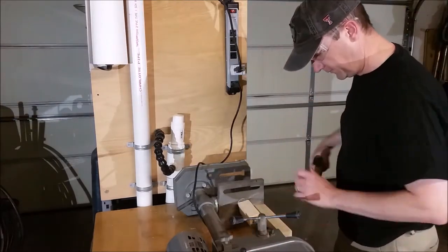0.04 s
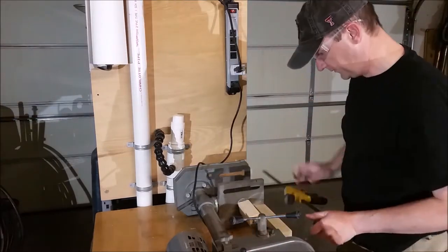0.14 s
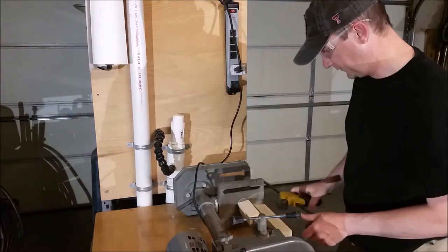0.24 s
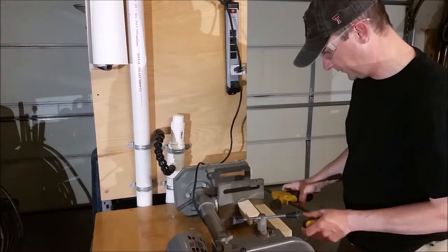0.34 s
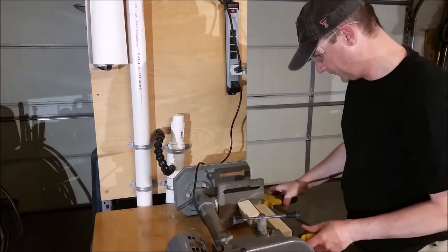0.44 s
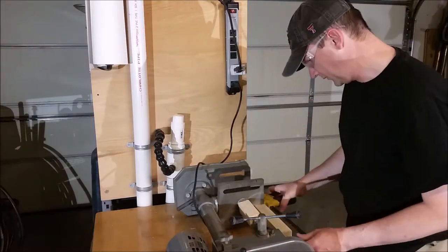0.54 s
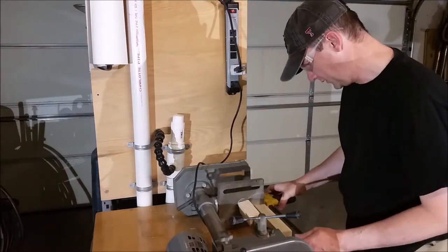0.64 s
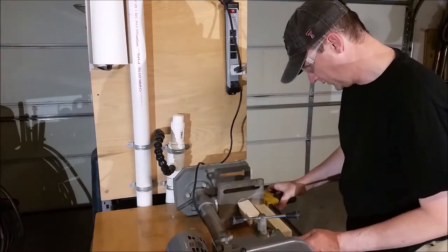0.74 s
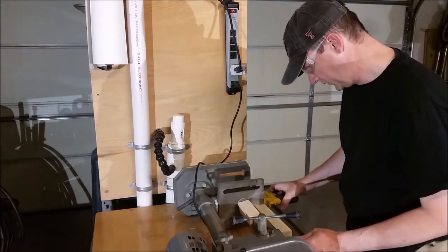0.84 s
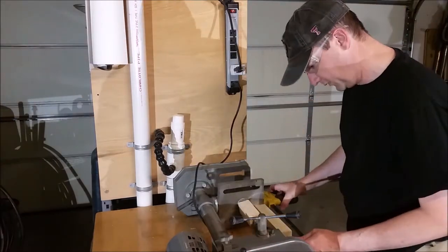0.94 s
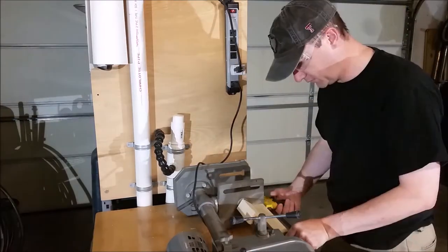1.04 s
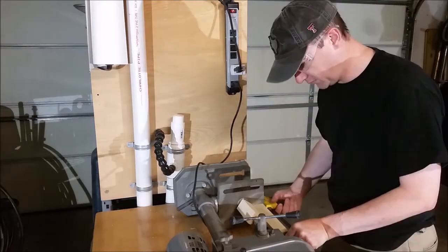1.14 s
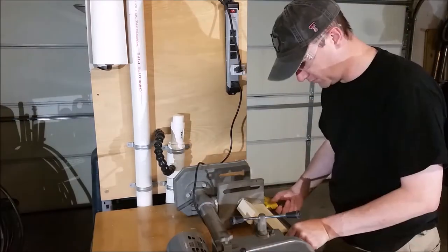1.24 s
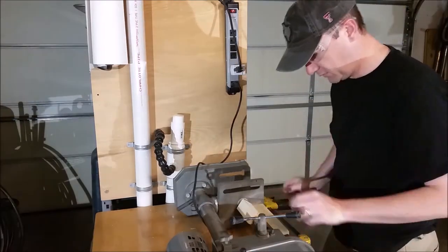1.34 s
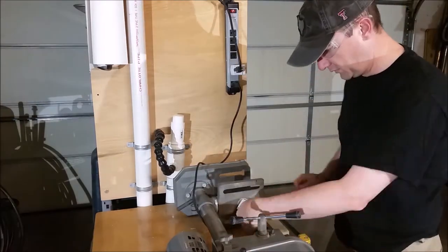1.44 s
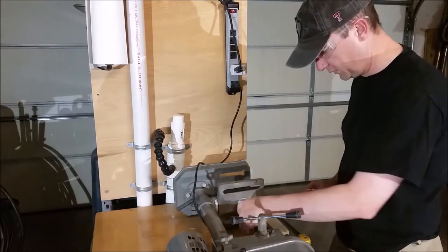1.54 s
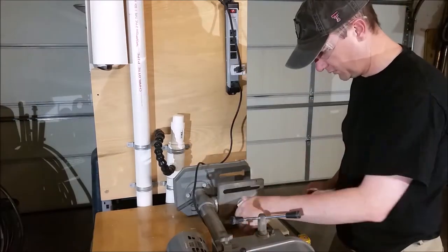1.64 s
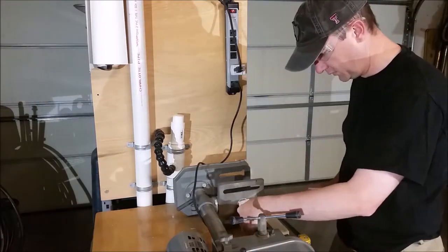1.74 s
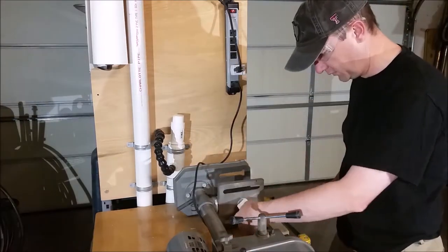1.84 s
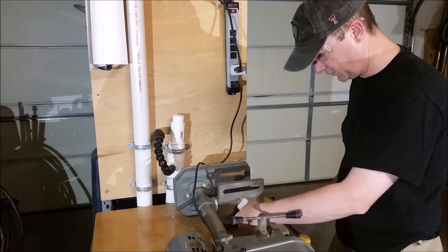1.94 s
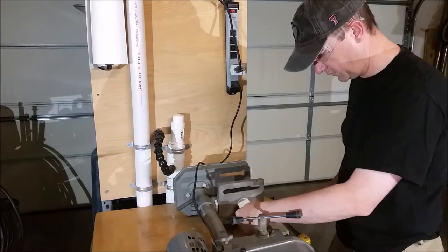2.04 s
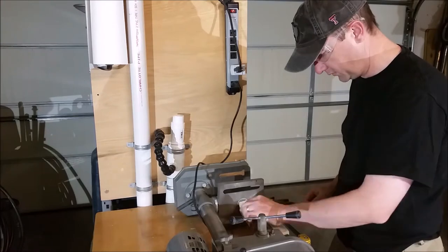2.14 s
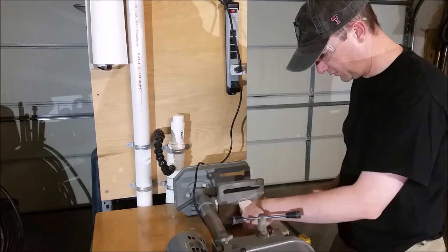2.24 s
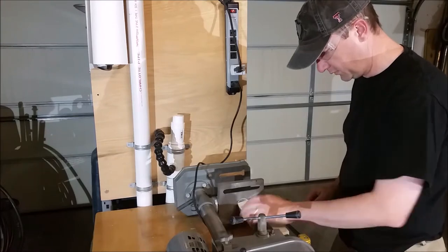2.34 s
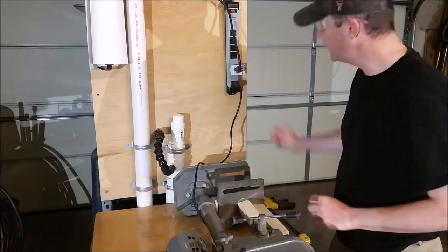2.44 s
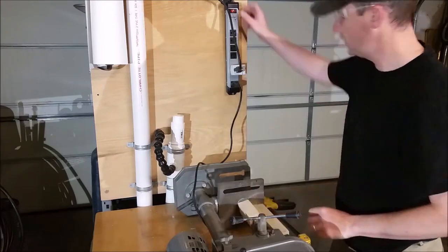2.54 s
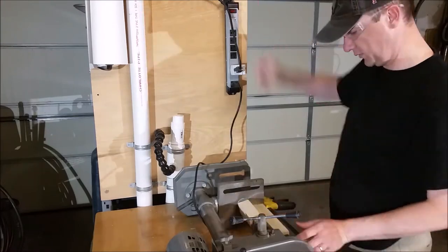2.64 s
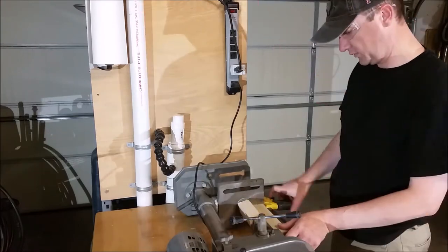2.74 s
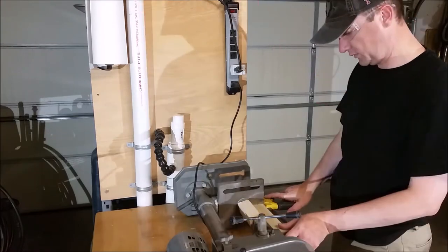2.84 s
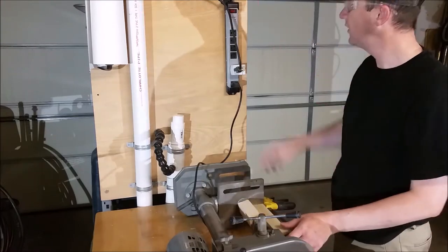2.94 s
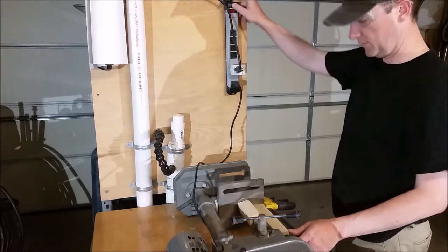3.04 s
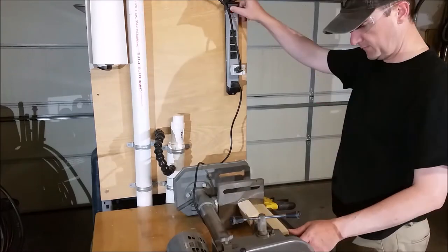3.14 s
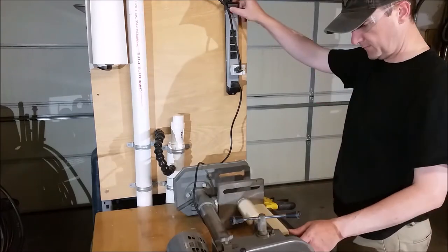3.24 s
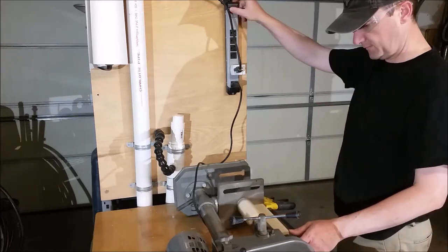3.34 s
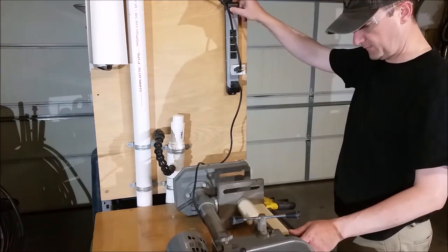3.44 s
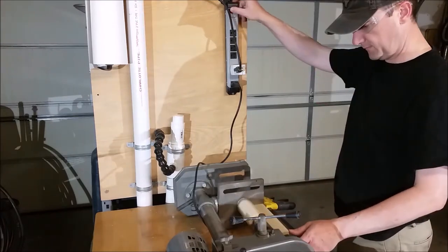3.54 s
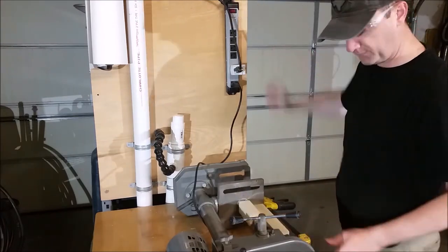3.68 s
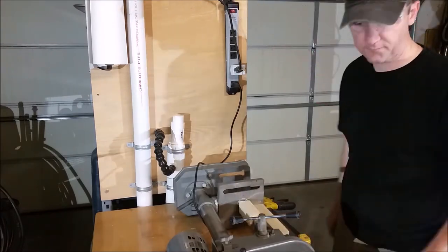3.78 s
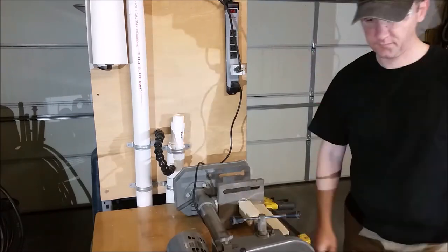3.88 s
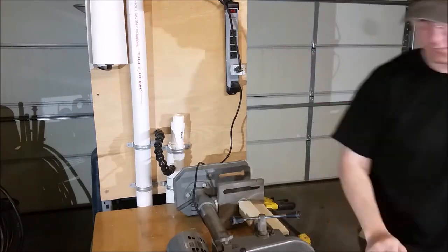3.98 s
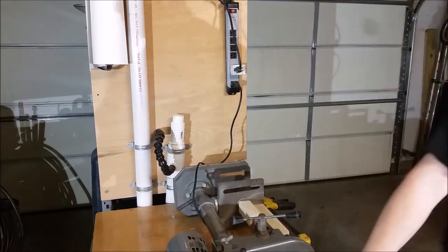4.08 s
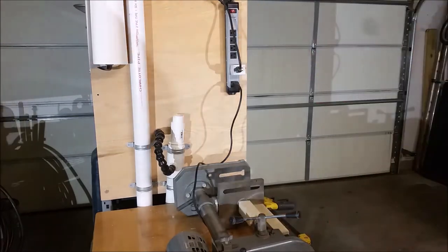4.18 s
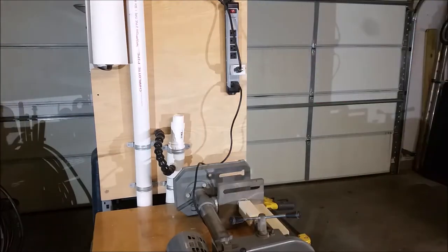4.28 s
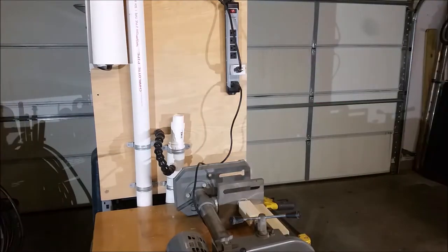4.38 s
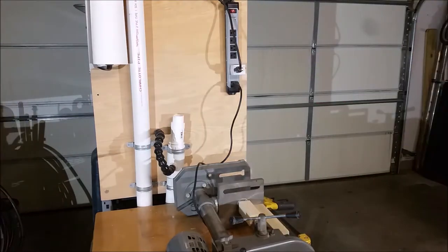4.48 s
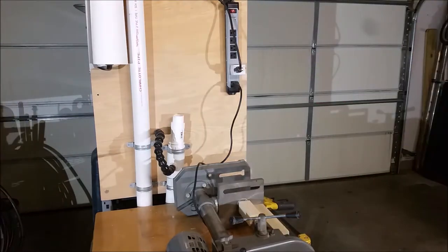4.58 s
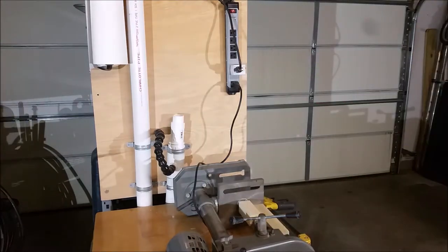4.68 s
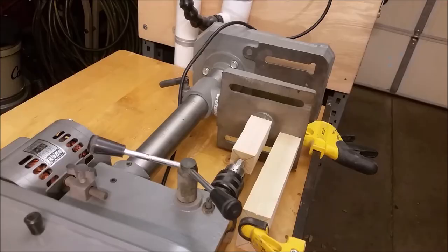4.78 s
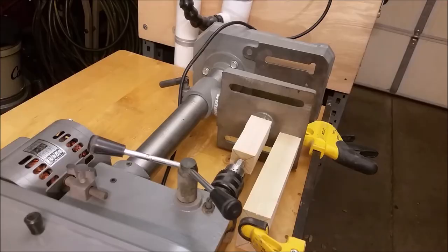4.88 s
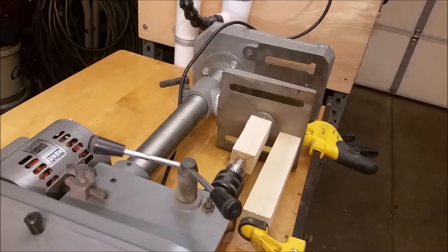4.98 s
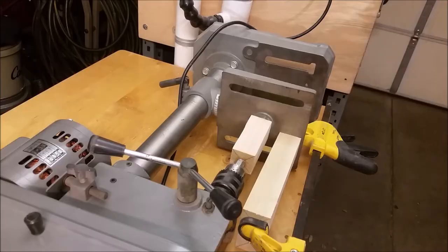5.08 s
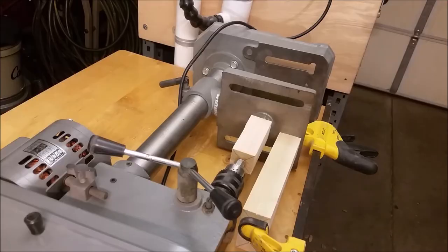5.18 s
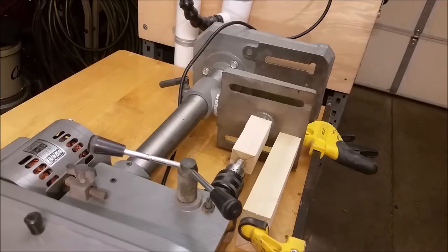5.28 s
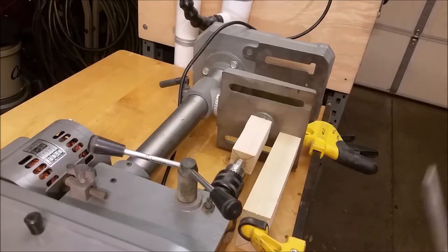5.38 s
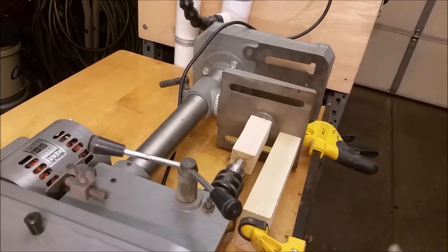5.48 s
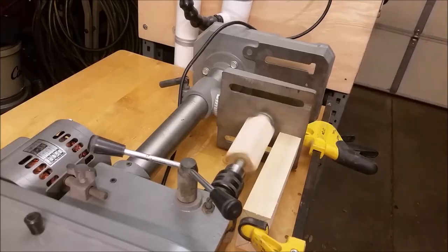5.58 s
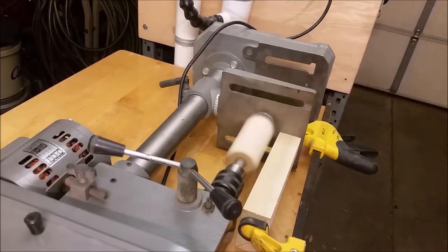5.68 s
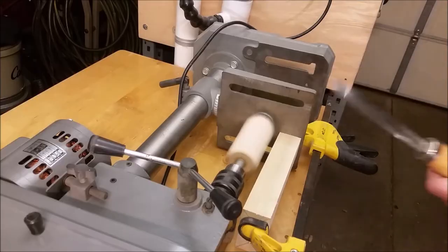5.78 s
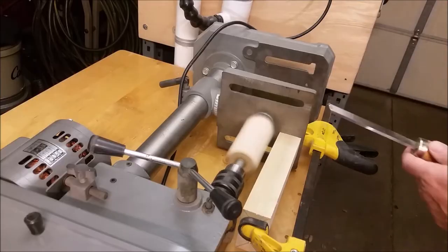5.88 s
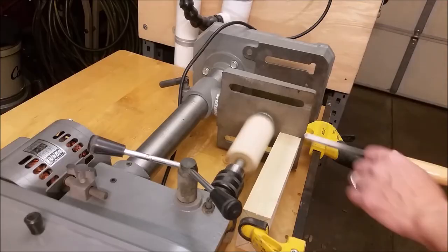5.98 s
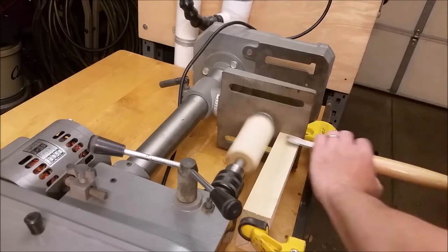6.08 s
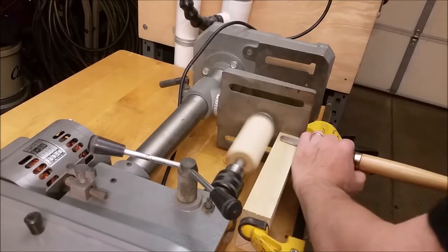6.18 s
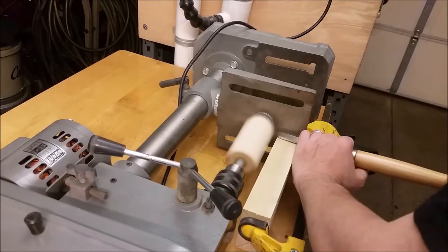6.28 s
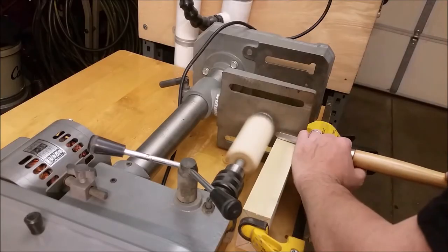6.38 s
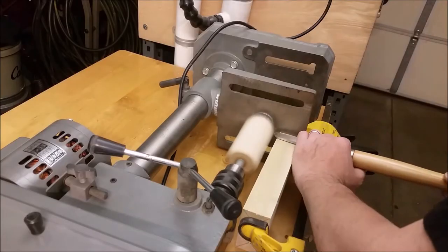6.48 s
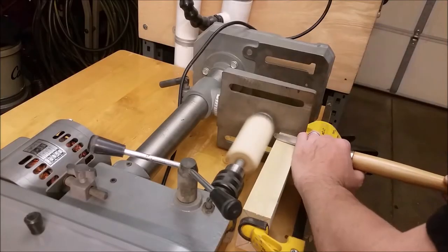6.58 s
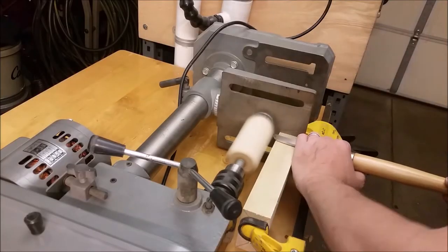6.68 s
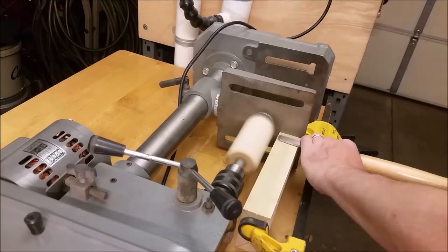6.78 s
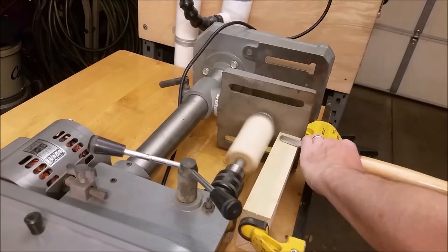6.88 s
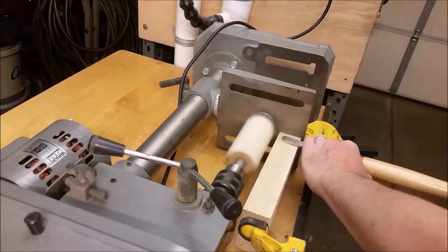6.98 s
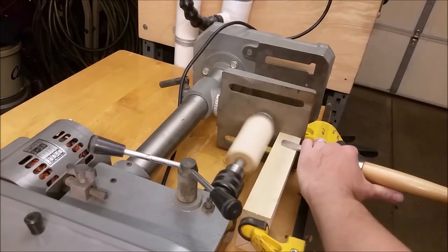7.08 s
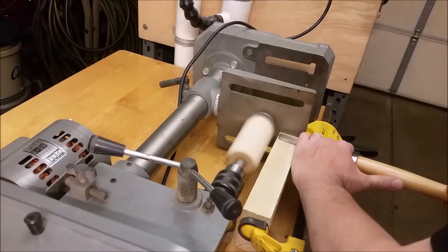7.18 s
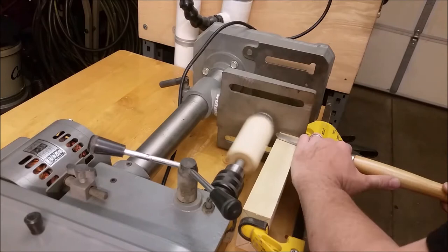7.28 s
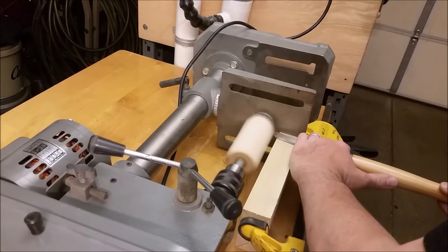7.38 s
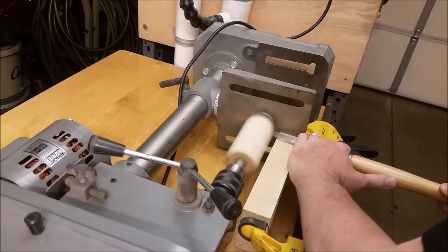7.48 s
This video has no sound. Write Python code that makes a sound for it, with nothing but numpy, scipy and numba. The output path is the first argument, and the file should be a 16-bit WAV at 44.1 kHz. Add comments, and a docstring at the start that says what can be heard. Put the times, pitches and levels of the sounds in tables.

```python
"""Drill press turned lathe

A sped-up workshop scene: hands clamp and knock a drill press laid down as a lathe, built from struck noise
and resonances. It runs briefly as noise patterns that repeat each turn, then steel tools clatter as beating
sine clusters. After a cut and a short silence it starts again and rattles to the end while a chisel, bright
noise pulsed once a turn, grazes the spinning block. Hum and thin whine lines lie under coloured room noise.
"""
import sys
import numpy as np
from scipy import signal
from scipy.fft import rfft, irfft
from scipy.io import wavfile
from scipy.ndimage import uniform_filter1d
from numba import njit

SR = 44100
rng = np.random.default_rng(int(sys.argv[2]) if len(sys.argv) > 2 else 0)


def transcribe(u):
    """Save the signal u as a 16-bit wav file named by the first command-line argument.

    u: samples, shape (n,) or (channels, n), limited to [-1, 1]; the rate is SR.
    q: integer samples, one column per channel.
    """
    v = np.clip(np.atleast_2d(u).T, -1, 1)
    q = np.round(v * 32767).astype(np.int16)
    wavfile.write(sys.argv[1], SR, q)


N = 331632
T = np.arange(N) / SR
CUT_S = 4.79  # the first part ends here


def undb(db):
    """Turns dB into an amplitude factor."""
    return np.exp(np.asarray(db) * np.log(10) / 20)


def unit(x):
    """Scales to an RMS of 1."""
    return x / np.sqrt(np.mean(x ** 2))


def noise():
    """White noise over the whole scene."""
    return rng.standard_normal(N)


@njit
def svf(x, hz, width):
    """State-variable band-pass whose centre may move; gain 1 at the centre."""
    y, band, low = np.empty(len(x)), 0., 0.
    for i in range(len(x)):
        g, k = np.tan(np.pi * hz[i] / SR), width / hz[i]
        v = (band + g * (x[i] + 1e-18 - low)) / (1 + g * (g + k))
        band, low, y[i] = 2 * v - band, low + 2 * g * v, k * v
    return y


def svf_twice(x, hz, width):
    """Two band-passes in a row, for steeper skirts."""
    return svf(svf(x, hz, width), hz, width)


@njit
def repeat(x, lag, share):
    """Each turn replays a share of the last one."""
    y = x * np.sqrt(1 - share ** 2)
    for i in range(lag, len(x)):
        y[i] += share * y[i - lag]
    return y


def resonate(x, peaks):
    """Sum of resonances (f/Hz, width/Hz, level/dB)."""
    return sum(undb(db) * svf(x, np.full(N, float(hz)), float(width)) for hz, width, db in peaks)


def high(x, hz, order=4):
    """High-pass."""
    return signal.sosfilt(signal.butter(order, hz, "high", fs=SR, output="sos"), x)


def colour(x, points, peaks=(), peak_db=0.):
    """Shapes x by (f/Hz, level/dB) points, adds resonance humps and scales to an RMS of 1."""
    f = np.maximum(np.arange(N // 2 + 1) * SR / N, 1)
    point_hz, point_db = np.array(points).T
    gain = undb(np.interp(np.log(f), np.log(point_hz), point_db))
    for hz, width, db in peaks:
        gain = gain + undb(db + peak_db) / (1 + (2 * (f - hz) / width) ** 2)
    return unit(irfft(rfft(x) * gain, N))


def curve(times, levels_db):
    """Gain along straight dB lines, silent outside."""
    return undb(np.interp(T, times, levels_db, left=-200, right=-200))


def walk(rate):
    """Random levels held 1 / rate s and slewed twice; spread near 1."""
    k = int(SR / rate)
    held = np.repeat(rng.standard_normal(N // k + 1), k)
    return 1.23 * uniform_filter1d(uniform_filter1d(held, k), k)[:N]


def waver(hz):
    """A steady line whose level and phase wander."""
    return undb(1.1 * walk(11)) * np.sin(2 * np.pi * (hz * T + rng.random()) + 0.32 * walk(10))


def strike(db, t60, rise_s=0.0013, crack_s=0.0031, tail_db=-4.0):
    """Envelope of one blow: a short crack and a room tail."""
    t = T[:SR // 2]
    return undb(db) * (1 - np.exp(-t / rise_s)) * (np.exp(-t / crack_s) + undb(tail_db - 60 * t / t60))


def add(drive, i, shape):
    """Lays an envelope onto a drive at sample i."""
    drive[i:i + len(shape)] += shape


# spectrum of the room air: (f/Hz, level/dB per Hz)
ROOM_AIR = [(20, -6), (53, -20), (105, -12.5), (182, -12.5), (422, -6), (472, -11.5), (660, -15),
            (1260, -20), (1440, -19.5), (2390, -24), (2990, -24), (3250, -24), (4940, -28.5), (16000, -38)]
# hum and whine lines: (f/Hz, level/dB)
HUM_LINES = [(479.1, -57), (1443, -72.5), (2972, -60), (3085, -78), (4872, -80), (7197, -82), (7700, -83)]
ROOM_AIR_DB = -59.5
WHINE_LATER_DB = -7  # lines above 2 kHz are fainter in the second part


def shop():
    """Room air under mains hum and a whine, each line wavering a little."""
    lines = 0
    for hz, db in HUM_LINES:
        level_db = db + 1.2 * walk(12) + WHINE_LATER_DB * (T > CUT_S) * (hz > 2000)
        lines = lines + undb(level_db) * np.sin(2 * np.pi * hz * T + 0.34 * walk(26))
    return undb(ROOM_AIR_DB + 1.1 * walk(3.3)) * colour(noise(), ROOM_AIR) + np.sqrt(2) * lines


# a hand or sleeve rubs over wood and steel: (t/s, length/s, level/dB, brightest f/Hz)
HAND_RUBS = [(0.214, 0.044, -42.5, 8800), (0.305, 0.031, -51.5, 12900), (0.4, 0.068, -44.5, 12100),
             (2.181, 0.05, -57, 5500), (2.605, 0.055, -52.5, 7100), (2.659, 0.038, -43.5, 9350),
             (2.742, 0.083, -56, 3930), (2.97, 0.033, -32, 8400), (3.09, 0.04, -50, 6200),
             (3.77, 0.089, -54.5, 9800), (3.972, 0.017, -45, 9700), (4.416, 0.05, -45, 4840)]


def rubs(rise_s=0.0091, fade_s=0.075, width_hz=2300.0, broad_db=-8):
    """Soft-edged bright hiss, each rub with its own spectral peak."""
    drive, hz, hiss = np.zeros(N), np.full(N, 8000.), noise() * undb(1.2 * walk(250))
    for s, length, db, peak_hz in HAND_RUBS:
        drive += curve(s + np.array([0, rise_s, length, length + fade_s]), db + np.array([-8, 3.5, -4, -30]))
        hz[int(s * SR):] = peak_hz
    return drive * high(svf(hiss, hz, width_hz) + undb(broad_db) * hiss, 1900)


def lean():
    """Leaning on the bench while tightening a clamp shakes it deep down: one swell of low noise."""
    return undb(-30.5 - ((T - 1.26) / 0.046) ** 2) * resonate(noise(), [(92, 380, 0)])


# short squeaks of a clamp screw: (t/s, level/dB, f/Hz)
SCREW_SQUEAKS = [(0.214, -36.5, 4900), (0.279, -42.5, 4620), (0.41, -35, 4600), (0.427, -35, 4680),
                 (1.241, -37, 3400), (1.275, -28.5, 3590), (2.371, -36.5, 4240), (3.726, -37, 4160)]


def squeaks():
    """Noise through a narrow band that rises by 2 % as the screw tightens."""
    drive, tone_hz = np.zeros(N), np.full(N, 1500.)
    for s, db, hz in SCREW_SQUEAKS:
        i = int(s * SR)
        add(drive, i, strike(db, t60=0.16, crack_s=0.0023))
        tone_hz[i:] = hz * (1 + 0.02 * np.minimum((T[i:] - s) / 0.047, 1))
    return undb(14.5) * svf_twice(drive * noise(), tone_hz, 430.0)


# knocks of hands, tools and the machine's switching on: (t/s, casting level/dB, struck spot f/Hz, scuff level/dB)
ALL_KNOCKS = [(0.003, -40.5, 1390, -52), (0.097, -41.5, 1920, -37.5), (0.217, -60, 1830, -39.5),
              (0.41, -51, 660, -37.5), (0.508, -32, 1390, -52), (0.8, -46, 1350, -62),
              (1.054, -42, 725, -55), (1.088, -30.5, 1470, -37), (1.124, -31.5, 1040, -42),
              (1.172, -29.5, 1400, -33.5), (1.197, -38, 1320, -61), (1.241, -34.5, 845, -29.5),
              (1.267, -29, 1000, -39), (1.305, -27.5, 1450, -30), (1.426, -36.5, 1320, -57),
              (1.631, -23, 2130, -51), (1.736, -44, 2080, -54), (2.157, -30.5, 636, -66),
              (2.214, -37.5, 2080, -47), (2.277, -41, 2190, -58), (2.372, -36.5, 930, -47),
              (2.753, -42, 585, -59), (2.958, -37, 855, -36), (2.974, -25, 560, -50),
              (3.086, -36.5, 970, -50), (3.168, -57, 1490, -49), (3.973, -58, 1500, -52),
              (3.23, -6.5, 2130, -18.5), (3.297, -13.5, 2100, -35), (3.665, -9.5, 1390, -33),
              (3.831, -30.5, 624, -42), (4.066, -35, 563, -38), (4.089, -25, 640, -46),
              (4.094, -19.5, 1610, -18), (4.1, -16.5, 1510, -28), (4.117, -10, 1500, -19),
              (4.127, -18.5, 2000, -16.5), (4.167, -15.5, 850, -21), (4.203, -32, 814, -34),
              (4.228, -22.5, 1430, -34), (4.273, -28.5, 820, -36), (4.403, -32.5, 534, -44),
              (4.415, -30, 1910, -48), (4.567, -39, 614, -43), (4.765, -41.5, 1020, -43.5),
              (4.962, -27.5, 2240, -42), (4.97, -29, 1240, -37.5), (5.03, -21.5, 1650, -31.5),
              (5.098, -33, 645, -64), (5.106, -29.5, 603, -50), (5.116, -23.5, 4600, -21.5),
              (5.1395, -25, 1240, -32), (5.15, -23, 3100, -43), (5.245, -42, 990, -78.5),
              (5.299, -45, 1610, -71), (5.316, -48.5, 1910, -62), (5.501, -40, 557, -37.5),
              (5.594, -29.5, 1520, -25.5), (5.682, -22, 1400, -47)]
# taps on the wooden rest: (t/s, level/dB, f/Hz)
WOOD_TAPS = [(2.657, -25.5, 590), (2.69, -35, 860)]
# extra low bench thud, mostly under a knock: (t/s, level/dB)
EXTRA_THUDS = [(0.508, -37.5), (1.33, -36), (2.753, -41.5), (2.974, -37), (4.127, -39.5), (4.765, -29.5)]
# resonances of the casting: (f/Hz, width/Hz, level/dB)
CASTING_MODES = [(602, 39, 2.5), (930, 416, -1), (1387, 168, 2.5), (2130, 68, -1)]
# resonances of the bench: (f/Hz, width/Hz, level/dB)
BENCH_MODES = [(251.3, 9, -3.5), (351, 14.6, 6)]
KNOCK_T60_S, SCUFF_T60_S = 0.19, 0.2  # room tails
THUD_DB, TREBLE_DB = -17, -5.5  # bench under the casting; treble under the scuff
# from the clatter through the second switch-on the bench hardly thuds
SOFT_THUD_FROM_S, SOFT_THUD_TO_S, SOFT_THUD_DB = 4.08, 5.9, -9.5


def knocks():
    """Each knock is a short crack and a room tail that drive struck spot, casting, bench and scuffing hiss."""
    # drives are envelopes for noise, blows are single-sample impulses
    drive, scuff_drive, blow, spot_hz = np.zeros(N), np.zeros(N), np.zeros(N), np.full(N, 1500.)
    for s, casting_db, hz, scuff_db in ALL_KNOCKS:
        i = int(s * SR)
        add(drive, i, strike(casting_db, KNOCK_T60_S))
        add(scuff_drive, i, strike(scuff_db, SCUFF_T60_S, rise_s=0.00028, crack_s=0.001, tail_db=-7.5))
        blow[i], spot_hz[i:] = undb(casting_db), hz
    casting_drive, casting_blow = drive.copy(), blow.copy()  # wood taps leave the casting silent
    for s, db, hz in WOOD_TAPS:
        i = int(s * SR)
        add(drive, i, strike(db, KNOCK_T60_S))
        blow[i], spot_hz[i:i + SR // 20] = undb(db), hz
    on_bench = undb(THUD_DB + SOFT_THUD_DB * (T > SOFT_THUD_FROM_S) * (T < SOFT_THUD_TO_S))
    bench_drive, bench_blow = on_bench * drive, on_bench * blow
    for s, db in EXTRA_THUDS:
        i = int(s * SR)
        add(bench_drive, i, strike(db, KNOCK_T60_S))
        bench_blow[i] += undb(db)

    # the blow itself rings the struck spot cleanly, the tail keeps all modes going roughly
    rough = noise()
    spot = undb(31.) * svf_twice(blow, spot_hz, 330.0)
    spot += undb(2.0) * svf_twice(drive * rough, spot_hz, 350.0)
    casting = resonate(casting_drive * rough + undb(14.0) * casting_blow, CASTING_MODES)
    casting = undb(1.5) * signal.sosfilt(signal.butter(4, 3000, fs=SR, output="sos"), casting)
    bench = resonate(bench_drive * noise() + undb(22.5) * bench_blow, BENCH_MODES)
    thud = undb(20.5) * high(resonate(bench, [(296.5, 300, 0.016)]), 230)
    scuff = undb(2.5) * high(resonate(scuff_drive * noise(), [(4550, 5100, 0.012)]), 2200)
    treble = resonate(scuff_drive * noise(), [(8180, 1500, 2.0), (12100, 16000, -8.5)])
    return spot + casting + thud + scuff + undb(TREBLE_DB) * high(treble, 6000)


# blows on loose steel tools: (t/s, level/dB, share of the longer tool 0-1, hardness/dB per octave)
TOOL_BLOWS = [(4.096, -10.5, 0.1, 10), (4.1194, -3, 0.17, -6.5), (4.126, -2, 0.03, 2),
              (4.1645, -4, 0.12, 5.5), (4.256, -23, 0.23, 6), (4.9716, -24, 0, -4), (5.03, -24.5, 0.03, 4),
              (5.116, -14, 0.1, 4), (5.1392, -8.5, 0.94, 3.5), (5.152, -2.5, 0.83, -0.5)]
# ringing modes of the shorter tool: (f/Hz, level/dB, t60/s)
SHORT_TOOL_MODES = [(2000, 4, 0.13), (2757, 5, 0.13), (4220, -1, 0.18), (4820, 7.5, 0.063), (6500, 3, 0.1),
                    (6980, 8.5, 0.033), (7480, -4.5, 0.22), (13850, -9, 0.17)]
# ringing modes of the longer tool: (f/Hz, level/dB, t60/s)
LONG_TOOL_MODES = [(1277, -1, 0.09), (3060, -4, 0.1), (7900, -4.5, 0.17), (14530, -5, 0.14),
                   (15390, -15.5, 0.12)]


def clatter(split=.018):
    """Blows ring the modes of two tools; each mode is a cluster that starts nearly in step, then drifts and beats."""
    out, t = np.zeros(N), T[:SR // 3]
    onset = 1 - np.exp(-t / 0.00042)
    for s, db, share, hard_db in TOOL_BLOWS:
        i = int(s * SR)
        for modes, part in ((SHORT_TOOL_MODES, 1 - share), (LONG_TOOL_MODES, share)):
            for hz, mode_db, t60 in modes:
                turn, spread = rng.standard_normal((2, 5, 1))  # five sines a cluster
                cluster = np.sin(2 * np.pi * hz * (1 + split * spread) * t + 0.99 * turn).sum(axis=0)
                tilt_db = hard_db * np.log2(hz / 4000)  # harder blows ring brighter
                ring = undb(db + mode_db + tilt_db - 28.5 - 60 * t / t60)
                out[i:i + len(t)] += part * ring * cluster * onset
    return out * undb(1.7 * walk(150))


# touches of the chisel edge: (t/s, length/s, level/dB)
CHISEL_TOUCHES = [(6.46, 0.16, -29.5), (6.602, 0.13, -31), (7.396, 0.11, -37)]
STEADY_DB, STEADY_S, LOOSEN_S = -3, 0.095, 0.1  # depth, onset and recovery of the calmed rattle


def chisel(bite=0.13, deepest=0.62, bite_db=-8, lift_db=-14):
    """The edge nicks the block once a turn, unevenly, and tears fibres between nicks."""
    turns = SPINDLE_HZ * T + 0.11
    size = undb(4. * rng.standard_normal(int(turns[-1]) + 1))[turns.astype(int)]
    nicks = noise() * (0.39 + size * np.exp(-(turns % 1) / 0.18))
    edge = resonate(nicks, [(6900, 2800, 7.0), (11500, 7300, 4.5), (14800, 2500, -13), (5270, 780, 10.0)])
    touches = 0
    for s, length, db in CHISEL_TOUCHES:
        times = s + length * np.array([0, bite, deepest, 1])
        touches = touches + curve(times, db + np.array([-25, bite_db, 0, lift_db]))
    return unit(high(edge, 3800)) * undb(3.0) * touches


def calming_db():
    """Each touch of the chisel presses the rattle down; it creeps back afterwards."""
    t = np.maximum(T - np.array(CHISEL_TOUCHES)[:, :1], 0)
    press = np.minimum(t / STEADY_S, 1) * np.exp(-np.maximum(t - STEADY_S, 0) / LOOSEN_S)
    return STEADY_DB * press.sum(axis=0)


# hard kicks that make the bench boom: (t/s, level/dB)
BENCH_KICKS = [(0.511, -43.5), (3.227, -25), (5.603, -35)]


def bench_boom():
    """Each kick rings the bench's low mode as a decaying sine."""
    out = np.zeros(N)
    for s, db in BENCH_KICKS:
        t = np.maximum(T - s, 0)
        out += undb(db - 60 * t / 0.29) * (1 - np.exp(-t / 0.0055)) * np.sin(2 * np.pi * 223 * t)
    return out


# level of the bench's shaking: (t/s, level/dB)
BENCH_SHAKE = [(3.33, -66.5), (3.39, -52), (3.62, -54), (3.72, -55.5), (3.85, -78)]
SAG = 0.14  # share of pitch lost when coasting


def bench_shake():
    """The bench shakes with spindle and motor together, then sags in pitch as they coast."""
    first_off_s = RUN_TIMES[0][2]
    sag = T - SAG * np.maximum(T - first_off_s, 0)
    return curve(*zip(*BENCH_SHAKE)) * sum(np.sin(2 * np.pi * row[0] * sag) for row in TURN_RATES[:2])


# motor orders of the second run: (f/Hz, level/dB)
MOTOR_ORDERS = [(581, -43), (872, -43), (1292, -40.5)]


def motor_orders():
    """Wavering lines that stand clear once the motor is up to speed."""
    speed = np.interp(T, [5.7, 5.8], [0, 1])
    return speed * sum(undb(db) * np.sqrt(2) * waver(hz) for hz, db in MOTOR_ORDERS)


# the two runs, far then close: (on t/s, up to speed t/s, off t/s, rattle level/dB, motor hum level/dB)
RUN_TIMES = [(3.227, 3.345, 3.635, -14, -34), (5.6, 5.735, 7.6, -23.5, -36)]
# share of full speed each run reaches: (far, close)
RUN_PACE = (.9982, 1)
# rattle spectra, far and close: (f/Hz, level/dB per Hz)
RATTLE_SPECTRA = [
    [(47, -63.5), (160, -37), (271, -19), (365, -6), (471, -12), (657, -8.5), (896, -4), (1050, -12.5),
     (1460, 0.5), (1740, -19), (2180, -9), (3170, -25), (4230, -18), (8000, -20.5), (12500, -29),
     (16000, -36.5)],
    [(60, -49), (200, -28.5), (408, -12.5), (527, -6.5), (822, -1), (930, -8), (1060, -9), (1410, 4.5),
     (1520, -6.5), (2650, -11), (5500, -18.5), (6740, -19.5), (8710, -14), (11300, -18.5), (12300, -26.5),
     (16000, -30)],
]
# resonances of the loose parts, far and close: (f/Hz, width/Hz, level/dB)
RATTLE_MODES = [
    [(1360, 56, -10.5), (2130, 230, 0.5), (2785, 300, -11.5), (3520, 220, -14.5), (4210, 110, -5),
     (5100, 130, -16), (5330, 65, -13), (7300, 49, -22.5)],
    [(229, 22, -19.5), (866, 95, 0.5), (1438, 13, 1), (2170, 70, -2), (2439, 33, -0.5), (2680, 88, -3.5),
     (2977, 68, -4.5), (3484, 79, -2.5), (4045, 87, -5), (4420, 160, -5.5), (4810, 35, -4),
     (5400, 600, -11), (8730, 290, -12), (10270, 250, -18)],
]
# spindle, motor, belt: (turn rate f/Hz, share repeated each turn, level/dB)
TURN_RATES = [(101, 0.83, -6), (118, 0.46, -7), (29.07, 0.65, -3.5)]
# jolt of each of the block's four corners: (level/dB)
CORNER_JOLTS = [1.5, -2.5, -9, -4]
# spindle orders that stand out: (multiple, far level/dB, close level/dB), against the rattle
SPINDLE_LINES = [(6, -17, -16.5), (7, -23, -31), (8, -14, -11.5), (9, -9, -32), (10, -31.5, -18),
                 (11, -23, -39), (14, -11.5, -24), (15, -21.5, -42), (16, -28, -23), (22, -21.5, -18.5),
                 (19, -35.5, -27), (24, -38, -23.5), (30, -36, -25), (26, -20.5, -22.5)]
SPINDLE_HZ = TURN_RATES[0][0]
CREEP_DB, SPIN_UP_DB_S, COAST_DB_S = -17, 293.5, 394.5  # rattle while slow, its rise and its fall
DULL_DB = -11  # treble lost while slow
HUM_START_DB, SURGE_DB, SURGE_S = -9, 7.5, 0.055  # hum at switch-on, its surge on nearing full speed


def motor_hum(on, full, hum_db):
    """The stator hums at 480 Hz, pitched up with the sped-up scene, and surges near full speed."""
    pull_db = HUM_START_DB * np.clip((full - T) / (full - on), 0, 1)
    pull_db += SURGE_DB * np.exp(-((T - full + 0.038) / SURGE_S) ** 2)
    hum = np.sqrt(2) * np.sin(2 * np.pi * 480 * T + 0.19 * walk(30)) * undb(0.31 * walk(23))
    return undb(hum_db + pull_db) * hum


def corner_jolts():
    """Each of the block's four corners gives a jolt of its own force, unevenly round the turn."""
    corner = 4 * SPINDLE_HZ * T
    count = int(corner[-1]) + 1
    force_db = 2.6 * rng.standard_normal(count) + np.resize(CORNER_JOLTS, count)
    return undb(force_db)[corner.astype(int)] * np.exp(-(corner % 1) / 0.43)


def drill_press():
    """Loose parts chatter in patterns that return with each turn of spindle, motor and belt."""
    out, jolt, calm_db = np.zeros(N), corner_jolts(), calming_db()
    for run, (on, full, off, rattle_db, hum_db) in enumerate(RUN_TIMES):
        pace = RUN_PACE[run]
        chatter = 0
        for hz, share, db in TURN_RATES:
            grains = noise() * undb(2.3 * rng.exponential(size=N))
            chatter = chatter + undb(db) * repeat(grains, int(round(SR / hz / pace)), share)
        chatter = chatter * (1 + 0.51 * jolt) * undb(0.24 * walk(40))
        body = colour(chatter, RATTLE_SPECTRA[run], RATTLE_MODES[run], peak_db=-1.5)
        slow_db = np.clip(SPIN_UP_DB_S * (T - full), CREEP_DB, 0)
        swing = undb(DULL_DB * slow_db / CREEP_DB)  # treble gain, full at speed
        bright = (swing - 1) * high(body, 2500) + swing * 0.85 * jolt * high(body, 7000)
        rattle = undb(rattle_db + slow_db) * (body + bright)
        lines = sum(undb(row[1 + run]) * waver(row[0] * SPINDLE_HZ * pace) for row in SPINDLE_LINES)
        rattle += undb(rattle_db + 2 * slow_db) * lines
        coast_db = -COAST_DB_S * np.maximum(T - off, 0) + calm_db
        out += (T > on) * undb(coast_db) * (rattle + motor_hum(on, full, hum_db))
    return out + bench_shake() + motor_orders() + bench_boom()


GAP_S, RETURN_S, SECOND_PART_DB = 0.091, 0.025, -1.5  # silence, fade-in time constant, level
CUT_TAIL_DB, CUT_TAIL_S = -19.5, 0.011


def cut():
    """The first part breaks off with a faint tail; after a silence the second one fades in."""
    back = np.maximum(T - CUT_S - GAP_S, 0)
    tail = undb(CUT_TAIL_DB) * (T < CUT_S + CUT_TAIL_S)
    return np.where(T < CUT_S, 1, tail + undb(SECOND_PART_DB) * (1 - np.exp(-back / RETURN_S)))


def scene():
    """All sources in the middle, split into two parts by the cut."""
    struck_and_rubbed = rubs() + lean() + squeaks() + knocks() + clatter()
    mid = shop() + struck_and_rubbed + chisel() + drill_press()
    return np.array([mid, mid]) * cut()


def record(dry):
    """Nearly mono; the top, from about 13 kHz, leans left. Peaks are rounded and both ends are cut."""
    lean_gain = .25 / (1 + (13000 * N / SR / np.arange(1, N // 2 + 2)) ** 6)
    top = irfft(rfft(dry) * lean_gain, N)
    wet = np.tanh(1.059 * (dry + np.array([[1], [-1]]) * top)) / 0.89
    wet = high(wet, 58, order=2)  # the deepest bass is dropped
    return signal.sosfilt(signal.ellip(10, .2, 80, 15900, fs=SR, output="sos"), wet)


dry = scene()
out = record(dry)
transcribe(out)
```